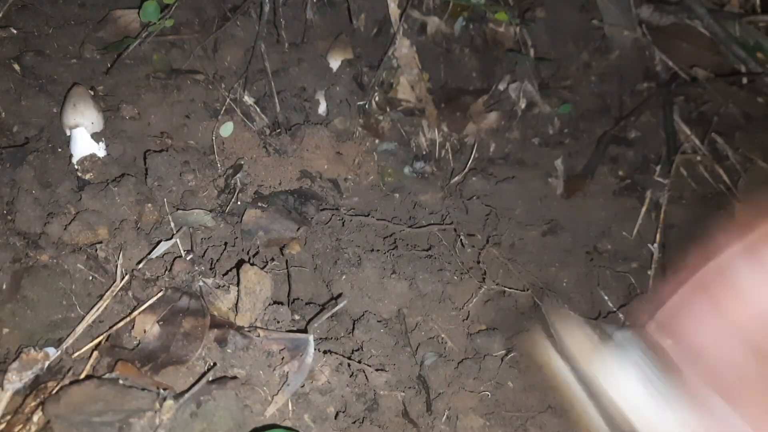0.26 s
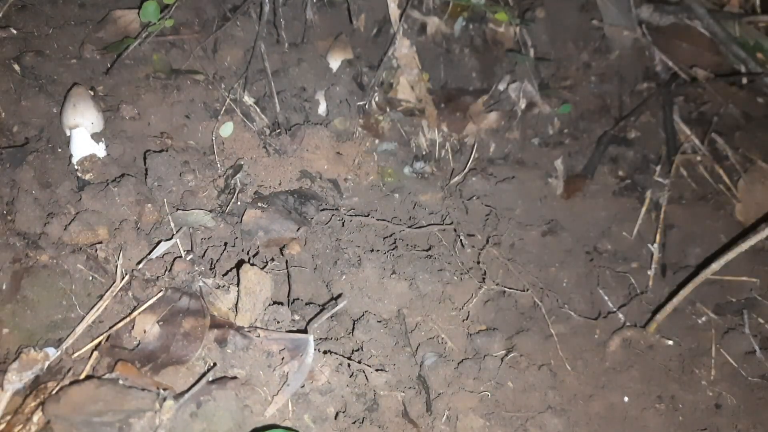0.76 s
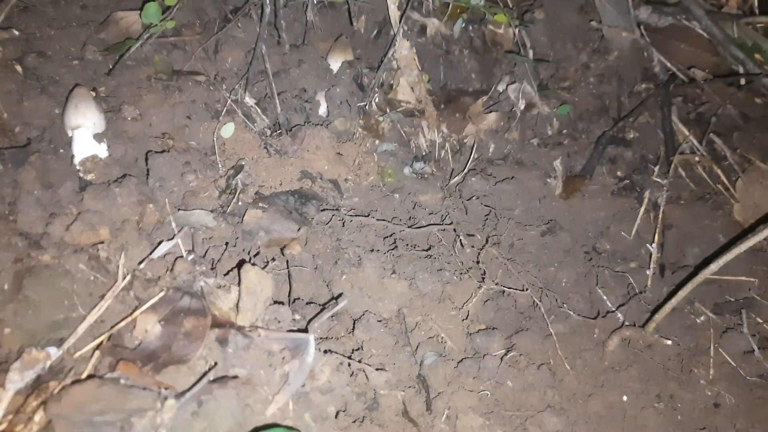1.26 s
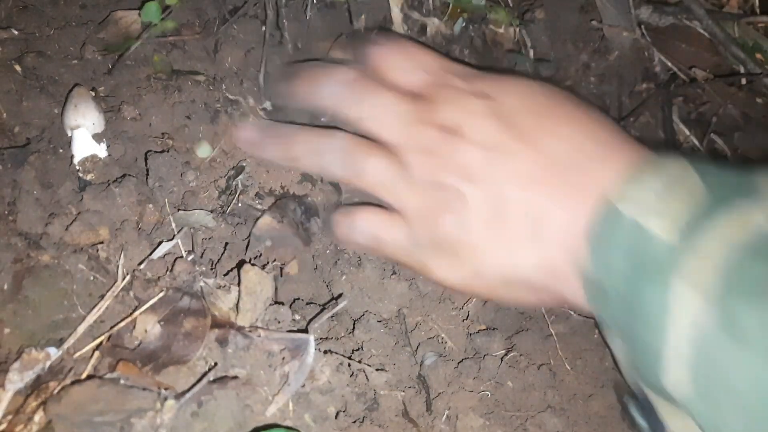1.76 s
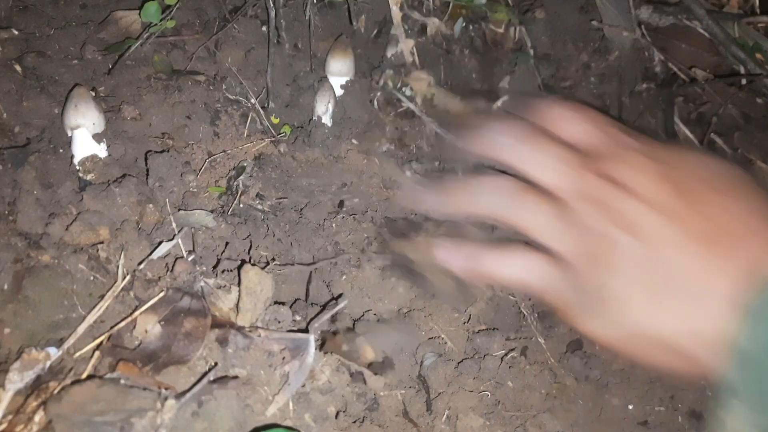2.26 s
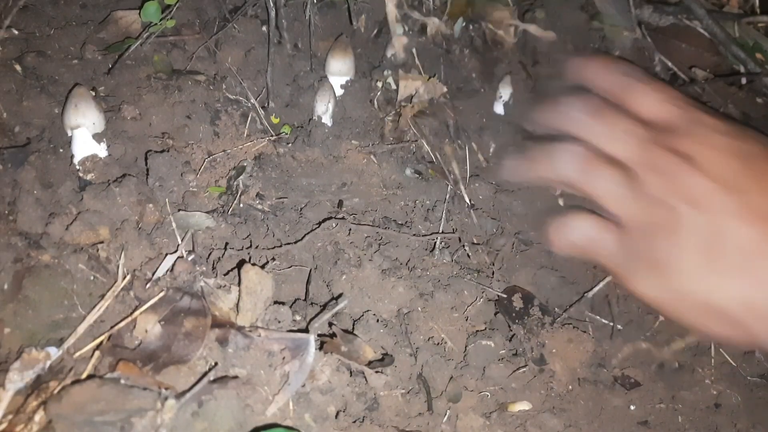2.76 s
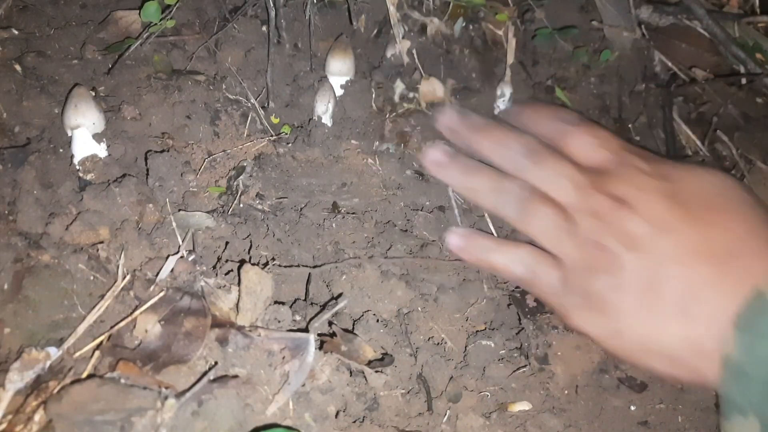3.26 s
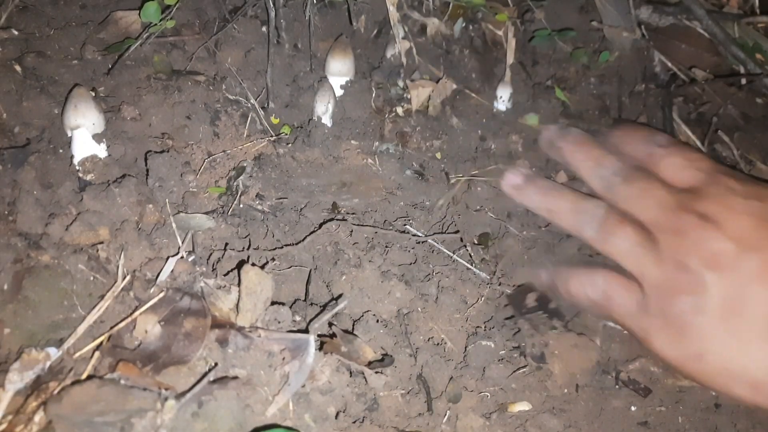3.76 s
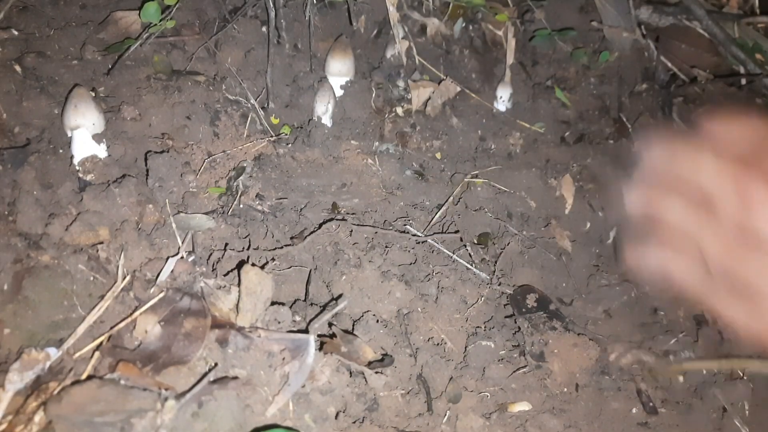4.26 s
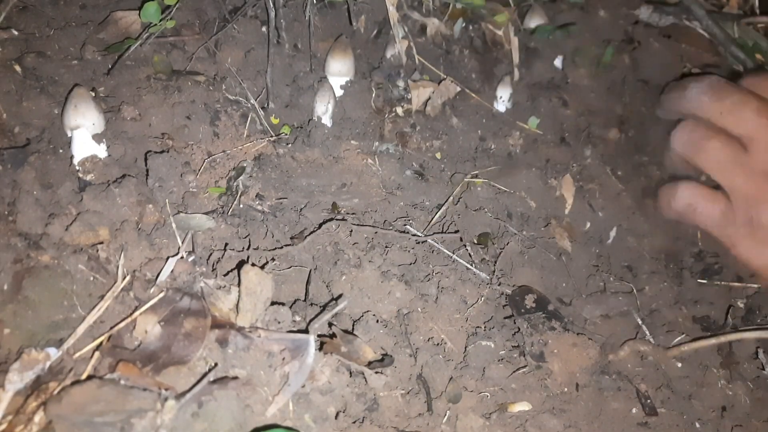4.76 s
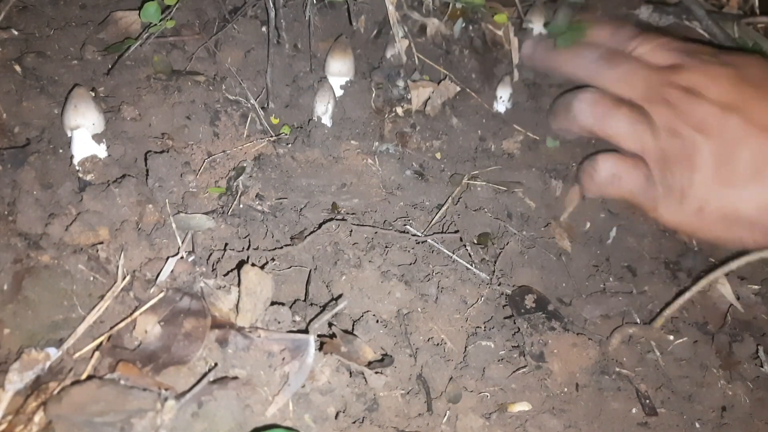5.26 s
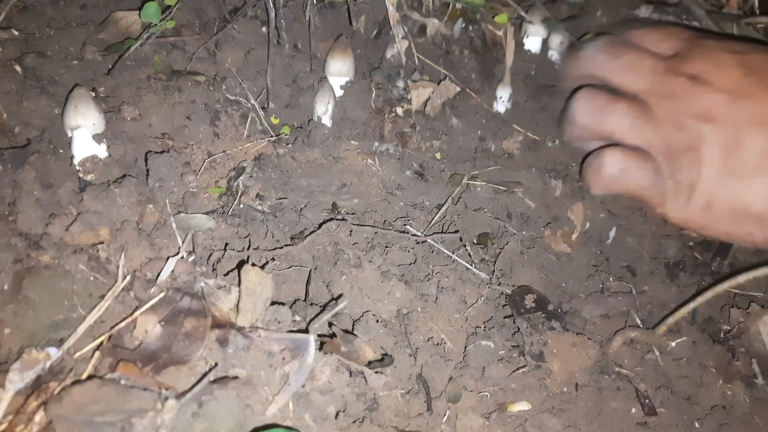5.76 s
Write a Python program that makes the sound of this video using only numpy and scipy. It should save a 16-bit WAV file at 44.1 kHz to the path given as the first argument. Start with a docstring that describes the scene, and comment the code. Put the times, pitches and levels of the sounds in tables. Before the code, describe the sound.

A hand works dry soil close to a stereo microphone, slightly to the right. A sleeve swishes softly, then fingers break the crust with short crunches and dull thumps, dragging through crumbs and snapping bits of twig and leaf. The passing arm briefly buffets the microphone. Two harder strikes come near the middle, and the digging carries on. Behind it is a still woodland night with a low rumble and very faint insects.

```python
"""Woodland floor on a still night, stereo microphone close to a hand working dry soil for mushrooms.
A sleeve swishes in; at 0.5 s the fingers strike the crust with a crunch and a dull thump, then drag
through crumbs and snap bits of twig and leaf. Near 1.5 s the arm sweeps by and buffets the right port.
The hardest blows fall at 2.6 and 3.5 s, and the digging goes on to the end at 6 s. Throughout, the
undergrowth gives a faint short echo, and insects chirr far off over a low rumble."""
import sys
import numpy as np
from scipy import signal
from scipy.fft import rfft, irfft, next_fast_len
from scipy.io import wavfile
from scipy.ndimage import uniform_filter1d

SR = 44100
rng = np.random.default_rng(int(sys.argv[2]) if len(sys.argv) > 2 else 0)


def master_out(mix):
    """Clip the mix to full scale and print it as 16-bit PCM to the path in sys.argv[1]."""
    frames = np.transpose(np.atleast_2d(mix))
    ceiling = np.clip(frames, -1, 1)
    pcm = np.round(ceiling * 32767).astype(np.int16)
    wavfile.write(sys.argv[1], SR, pcm)


N = 265923
HZ = abs(np.fft.fftfreq(4096, 1 / SR))  # frequency axis of the dB curves

# fingers touch the crust, it breaks, the earth knocks and rebounds: t/s, break level/dB, t60/s,
# tilt/(dB per octave), clod ring f/Hz, touch lead/s, touch level/dB,
# knock level/dB, knock f/Hz, knock swell/s, rebound level/dB, rebound f/Hz
BLOWS = [(0.5375, -20.5, 0.039, 2, 2080, .025, -28.5, -23, 191, 0.0028, -30.5, 107),
         (1.360, -16.8, 0.085, 2.5, 1620, 0.016, -24.5, -16.5, 134, 0.003, -29.5, 149),
         (1.384, -16.5, 0.026, 0, 2070, 0.01, -28.5, -27, 170, 0.0033, -26.5, 71.5),
         (2.5779, -11, 0.028, -1, 1940, 0.01, -27.5, -19.5, 181, 0.0051, -21.5, 86),
         (3.4621, -10, 0.013, 0.5, 1600, 0.0043, -37.5, -11.5, 220, 0.0011, -22, 83.6),
         (4.1912, -19, 0.062, .5, 2550, .0065, -26, -26.5, 180, 0.0044, -35.5, 89),
         (4.9581, -14, 0.06, -0.5, 1514, 0.013, -32.5, -20.5, 208, 0.0031, -25.5, 89.5),
         (5.7973, -19, 0.09, 0, 1400, 0.0082, -35.5, -28, 219, 0.0054, -38, 112)]
# how much the hand stirs the loose litter: t/s, relative level/dB
STIRRING = [(0, -56.5), (.14, -50.5), (.42, -53), (.6, -72), (.8, -50.5), (1.4, -51), (2.33, -56),
            (2.6, -64), (2.92, -42), (3.07, -59), (3.45, -63.5), (3.9, -55.5), (4.3, -59.5), (4.57, -49),
            (4.78, -80), (5.05, -61), (5.66, -63), (5.84, -51), (6.03, -65)]
# spectrum of crumbs and dry bits: f/Hz, level/dB
CRUMB_SPECTRUM = [(150, -6.5), (300, -2.5), (600, -5), (850, -6), (1200, -1), (1700, 3.5), (2300, -8),
                  (3000, -5), (4000, -5.5), (5500, -9), (8200, -2), (9300, -10), (12500, -8.5),
                  (15800, -12)]
# how alike sleeve and night air are at the two microphone ports: f/Hz, likeness
AIR_LIKENESS = [(60, 0.97), (250, 0.88), (600, 0.82), (2000, 0), (5000, 0)]


def soil():
    """Close up: a light touch, a dense crunch as the crust breaks, and grainier drags through crumbs."""
    # spectrum of the dry crust: f/Hz, level/dB
    crust = [(150, 4), (300, 4.5), (600, -7.5), (850, -7), (1200, -6.5), (1700, 6.5), (2300, -8),
             (3000, -7.5), (4000, -10), (5500, -12.5), (8200, -7.5), (9300, -16.5), (12500, -11),
             (15800, -15.5)]
    # finger drags: t/s, level/dB, rise/s, t60/s, tilt/(dB per octave), ring f/Hz
    scrapes = [(.52, -36.5, 0.022, 0.057, -1, 607), (0.766, -40, 0.014, 0.35, -1, 1950),
               (.83, -38, 0.041, 0.13, 2, 8200), (.95, -33, 0.02, 0.038, 4.5, 7040),
               (1.345, -29, 0.02, 0.086, -8, 590), (1.675, -45, 0.017, 0.23, 0.5, 1970),
               (1.909, -44.5, 0.032, 0.46, 2.5, 1750), (2.825, -42.5, .009, 0.19, 0.5, 2310),
               (2.912, -34, 0.04, 0.3, 3, 1650), (3.033, -34, 0.021, 0.038, 1.5, 2340),
               (3.74, -27, 0.035, 0.096, 1, 7300), (3.782, -23.5, 0.0081, 0.055, 1, 2470),
               (4.328, -29.5, 0.011, 0.053, 1, 2980), (4.48, -35, .021, 0.12, -1, 2580),
               (4.59, -29, 0.03, 0.13, 1, 2460), (4.623, -27, 0.0081, 0.092, 1.5, 1600),
               (4.68, -43.5, 0.0088, 0.23, 0.5, 710), (5.42, -45, 0.011, 0.25, -2, 1700),
               (5.659, -47.5, 0.021, 0.19, -1.5, 1860), (5.714, -38, 0.014, 0.11, 4, 2350),
               (5.799, -22, .009, 0.057, 7, 8300)]
    out, touch_rise_s = np.zeros((2, N)), 0.0022
    for s, db, t60, tilt_db, ring_hz, lead_s, touch_db, *_ in BLOWS:
        touch = burst(touch_db, touch_rise_s, t60=0.054, tilt_db=1.5, ring_hz=ring_hz, spectrum=crust,
                      ring_db=-6, per_s=16000, spread_db=5, ripple_db=4.5,
                      hold_s=max(lead_s - touch_rise_s, 0))  # lasts until the break
        crunch = burst(db, rise_s=0.0027, t60=t60, tilt_db=tilt_db, ring_hz=ring_hz, spectrum=crust,
                       ring_db=7.5, per_s=16000, spread_db=3, ripple_db=5.5)
        add(out, s - lead_s, touch)
        add(out, s, crunch)
    for s, *drag in scrapes:
        add(out, s, burst(*drag, CRUMB_SPECTRUM, ring_db=6.5, per_s=3600, spread_db=1,
                          ripple_db=5.5, clump_db=1.5))
    return out


def burst(db, rise_s, t60, tilt_db, ring_hz, spectrum, ring_db, per_s, spread_db, ripple_db,
          clump_db=0, hold_s=0):
    """A shower of grains that builds while the soil is loaded and dies as it settles."""
    # resonances of the microphone's housing and ports: f/Hz, width/Hz, level/dB
    housing = [(591, 175, 8), (774, 380, -3), (1530, 200, 4), (2335, 340, 8.5), (3160, 350, 0.5),
               (3640, 480, -5.5), (4470, 92, 5), (6270, 140, 4), (7540, 180, 0.5), (7750, 1200, -1.5),
               (10360, 1260, -2.5)]
    t = np.arange(SR // 3) / SR
    rise = np.minimum(t / max(rise_s, 1e-4), 1)
    decay = amp(-60 * np.maximum(t - rise_s - hold_s, 0) / max(t60, 1e-3))
    clumps = unit(amp(clump_db * wobble(len(t), per_s=275)))  # crumbs stick and give way together
    slope = tilt_db * np.log2(np.maximum(HZ, 400) / 3000)
    # each fragment has one main ring and many weaker ones of its own
    knots_hz = np.arange(0, SR / 2, 200)
    ripple = ripple_db * np.interp(HZ, knots_hz, rng.standard_normal(len(knots_hz)))
    ripple *= np.minimum(HZ / 4000, 1)
    ripple /= max(t60 / 0.087, 1)  # a long drag stirs many fragments, whose rings average out
    rings = peak(ring_hz, 280, ring_db) + ripple + sum(peak(*mode) for mode in housing)
    shower = grains(len(t), per_s, spread_db) * rise * decay * clumps
    return amp(db) * colour(shower, read(spectrum, HZ) + slope + rings)


def grains(count, per_s, spread_db):
    """Tiny fractures of uneven size, at the same instants for both ports."""
    size = amp(spread_db * np.minimum(rng.exponential(1, count), 4))
    breaks = rng.random(count) < per_s / SR
    return unit(size * breaks * rng.choice([-1, 1], (2, count)))


def earth(rebound_after_s=0.0199, rebound_swell_s=0.0072, clod_cycles=0.57):
    """Packed earth knocks and rebounds under each blow; dropped clods only tap it."""
    # small clods landing: t/s, level/dB, f/Hz
    clods = [(0.7645, -31.5, 312), (0.8256, -32, 300), (.858, -34, 335), (4.039, -36, 660)]
    pushes = [(s, db, hz, clod_cycles / hz) for s, db, hz in clods]
    for s, *_, knock_db, knock_hz, swell_s, rebound_db, rebound_hz in BLOWS:
        pushes.append((s, knock_db, knock_hz, swell_s))
        pushes.append((s + rebound_after_s, rebound_db, rebound_hz, rebound_swell_s))
    return swings(pushes, rough=0.043)


def swings(pushes, rough, sag_per_cycle=0.029):
    """Low, slightly ragged pushes that swell, then slow and settle within a few cycles."""
    out, t = np.zeros((2, N)), np.arange(SR // 6) / SR
    for s, db, hz, swell_s in pushes:
        swell = (t / swell_s * np.exp(1 - t / swell_s)) ** 0.81
        turns = np.cumsum(hz / (1 + sag_per_cycle * hz * t)) / SR
        motion = np.sin(2 * np.pi * turns) + rough * wobble(len(t), per_s=4.5 * hz)
        add(out, s, -amp(db) * swell * motion)
    return out


def twigs(ticks=24, low_hz=1570, high_hz=8300):
    """Twigs and leaves snap under the hand; stray ticks follow the strength of the stirring."""
    # the distinct snaps: t/s, relative level/dB, ring f/Hz
    snaps = [(0.763, -19.5, 8300), (0.783, -27, 1920), (.8034, -23.5, 2040), (.825, -21.5, 1970),
             (0.8562, -25, 1920), (0.8668, -27, 1950), (0.9711, -34, 7820), (1.2634, -28, 7800),
             (1.7391, -30, 8260), (2.174, -50, 5340), (2.2356, -39, 7700), (2.3103, -43, 7150),
             (2.41, -42, 7740), (2.4305, -44, 7900), (2.6632, -39.5, 8700), (2.7732, -32, 8900),
             (2.828, -25.5, 2320), (2.8726, -28, 7240), (2.9161, -23, 8750), (2.9353, -29, 8600),
             (2.9418, -22.5, 2750), (2.959, -37, 6500), (2.9745, -33, 6000), (2.9879, -26, 7340),
             (3.019, -29.5, 4500), (4.044, -37.5, 8030), (4.53, -24.5, 7560), (4.6016, -29, 2360),
             (5.31, -43.5, 1750), (5.4202, -37, 1700), (5.476, -37.5, 1740), (5.9915, -45.5, 5700)]
    out = np.zeros((2, N))
    for s, db, ring_hz in snaps:
        add(out, s, snap(db, ring_hz))
    for when, smallness, softness in rng.random((ticks, 3)):
        s = when * N / SR
        db = np.interp(s, *np.transpose(STIRRING)) + 12 - 1.5 * (2 * softness - 1)
        add(out, s, snap(db, low_hz * (high_hz / low_hz) ** smallness))
    return amp(-2.5) * out


def snap(db, ring_hz):
    """One dry piece breaking: the smaller it is, the higher and brighter."""
    return burst(db, rise_s=0.00004, t60=0.031, tilt_db=1.8 * np.log2(ring_hz / 4000), ring_hz=ring_hz,
                 spectrum=CRUMB_SPECTRUM, ring_db=12, per_s=14000, spread_db=-1.3, ripple_db=4.5)


def litter():
    """Fine crackle of leaves and dust that follows the stirring of the hand."""
    # spectrum of loose litter: f/Hz, level/dB
    spectrum = [(200, 13.5), (500, 6.5), (900, 2), (1300, -4), (2000, -1.5), (4000, -2.5), (6500, -2),
                (8200, 4), (9300, -9), (12500, -0.5), (15800, -3.5)]
    stirring = amp(np.interp(np.arange(N) / SR, *np.transpose(STIRRING)) - 2)
    return stirring * colour(grains(N, per_s=1800, spread_db=0.5), read(spectrum, HZ))


def sleeve(idle_db=-72.5):
    """Cloth, never quite still, slides with the arm: a soft swish, and a narrow sheen to the left."""
    # arm sweeps: fastest at t/s, length/s, swish level/dB, sheen level/dB
    sweeps = [(0.257, 0.57, -50.5, -80), (0.367, 0.44, -51.5, -48.5), (1.297, 0.5, -46.5, -72),
              (1.526, 0.44, -54, -52.5), (1.742, 0.55, -59, -49.5), (2.319, .15, -52, -62),
              (4.002, 0.25, -54.5, -59)]
    # spectra of the cloth's swish and the weave's sheen: f/Hz, level/dB
    cloth = [(60, -8.5), (300, 0), (800, -2), (1400, -5), (2500, -10.5), (5000, -14.5), (8200, -11.5),
             (16000, -57)]
    weave = [(60, -40), (7500, -33), (9200, -10), (10200, -9), (11100, -6), (11900, -8), (12700, -26),
             (16000, -13)]
    t, swish_power, sheen_power = np.arange(N) / SR, amp(idle_db) ** 2, 0
    for s, length_s, swish_db, sheen_db in sweeps:
        speed = np.cos(np.pi * np.clip((t - s) / length_s, -0.5, 0.5)) ** 2
        swish_power += (amp(swish_db) * speed) ** 2
        sheen_power += (amp(sheen_db) * speed ** 3.5) ** 2  # grows faster with speed than the swish
    swish = np.sqrt(swish_power) * colour(grains(N, per_s=9000, spread_db=1.5), read(cloth, HZ))
    sheen = np.sqrt(sheen_power) * noise(read(weave, HZ)) * amp([[2.5], [-2.5]])
    return ports(swish, AIR_LIKENESS, lag_s=0.00017) + sheen


def buffets(swell_s=0.0069):
    """Air pushed by the passing arm hits the microphone, mostly its right port."""
    # puffs of air: t/s, level/dB, f/Hz
    puffs = [(1.486, -18.5, 134.7), (1.563, -22.5, 97.6), (1.645, -30.5, 100.5), (1.669, -26, 91.5),
             (1.695, -28.5, 101)]
    return swings([(*puff, swell_s) for puff in puffs], rough=0.31) * amp([[-18], [0]])


def diffuse(x):
    """Fragments ring differently in each direction, so scatter keeps the loudness but loses the rings."""
    # spectrum coming back from all sides: f/Hz, level/dB
    spectrum = [(100, 1), (400, 2.5), (900, -5.5), (1600, 1.5), (2500, 2), (4000, -1.5), (6000, -4),
                (8200, -3.5), (9400, -8), (15800, -7.5)]
    power = abs(uniform_filter1d((x ** 2).mean(0), size=90))
    return np.sqrt(power) * noise(read(spectrum, HZ))


def undergrowth(x, t60, build_s):
    """Echoes from the stems and ground around the microphone, different at each port."""
    t = np.arange(SR // 2) / SR
    taps = grains(len(t), per_s=4200, spread_db=3) * amp(-60 * t / t60) * np.minimum(t / build_s, 1)
    return signal.oaconvolve(x, taps / np.linalg.norm(taps[0]), axes=1)[:, :N]


def insect(pitch_hz=6250):
    """One distant insect gives faint, slightly unsteady chirps."""
    # chirps: t/s, level/dB, length/s
    chirps = [(3.639, -61, 0.25), (5.198, -70, 0.18)]
    out = np.zeros((2, N))
    for s, db, length_s in chirps:
        count = int(length_s * SR)
        turns = np.cumsum(pitch_hz * (1 + 0.008 * wobble(count, per_s=265))) / SR
        add(out, s, amp(db) * signal.windows.hann(count) * np.sin(2 * np.pi * turns))
    return out


def chorus(centre_hz=8200, width_hz=400):
    """Farther off, small insects chirr in a narrow band that swells and fades unevenly."""
    band_db = -np.minimum(12 * ((HZ - centre_hz) / width_hz) ** 2, 60)
    pulsing = unit(amp(5 * wobble(N, per_s=10)))
    return amp(-73.5) * pulsing * noise(band_db)


def night():
    """The ambience of the place: a steady low rumble under a faint hiss that wavers."""
    # spectrum of the night air: f/Hz, level/dB
    spectrum = [(20, -36), (35, -12.5), (60, 4.5), (130, 0.5), (200, -3.5), (300, -10.5), (500, -24),
                (1000, -35.5), (2000, -30), (4000, -50), (6400, -32), (8100, -37), (9300, -40.5),
                (15800, -40)]
    air = noise(read(spectrum, HZ))
    rumble = signal.sosfiltfilt(signal.butter(2, 500, fs=SR, output="sos"), air)
    hiss = (air - rumble) * amp(0.48 * wobble(N, per_s=13))
    return amp(-50.5) * ports(rumble + hiss, AIR_LIKENESS)


def ports(x, likeness, lag_s=0, balance=None):
    """The microphone's two ports hear partly the same sound; the left gets it lag_s later."""
    size = next_fast_len(N + 512)
    hz = np.fft.rfftfreq(size, 1 / SR)
    other, right = rfft(x, size)
    same = np.clip(read(likeness, hz), 0, 1)
    left = (same * right + np.sqrt(1 - same ** 2) * other) * np.exp(-2j * np.pi * hz * lag_s)
    lean = amp(read(balance, hz) / 2) if balance else 1
    return irfft([left * lean, right / lean], size)[:, :N]


def amp(db):
    """Decibels to gain."""
    return 10 ** (np.asarray(db) / 20)


def unit(x):
    """Scales to rms 1."""
    return x / np.sqrt(np.mean(x ** 2) + 1e-20)


def read(points, hz):
    """Reads a spectrum table on a log-frequency axis."""
    f, value = np.transpose(points)
    return np.interp(np.log(hz + 1), np.log(f + 1), value)


def peak(hz, width_hz, db):
    """One resonance as a dB curve over HZ."""
    return db / (1 + ((HZ - hz) / (width_hz / 2)) ** 2)


def colour(x, db):
    """Minimum-phase filter of unit power with a dB curve over HZ."""
    log_gain = np.log(unit(amp(db)) + 1e-6)
    taps = np.fft.ifft(np.exp(np.conj(signal.hilbert(log_gain)))).real
    return signal.oaconvolve(x, taps[None], axes=1)[:, :x.shape[1]]


def noise(db):
    """Two unrelated channels of noise, shaped by a dB curve over HZ."""
    return colour(rng.standard_normal((2, N)), db)


def wobble(count, per_s):
    """Smooth random motion of rms near 1."""
    knots = rng.standard_normal(count // 20)
    return np.interp(np.arange(count) * per_s / SR, np.arange(len(knots)), knots)


def add(mix, s, sound):
    """Lays a sound into the mix at time s."""
    part = mix[:, max(round(s * SR), 0):][:, :sound.shape[-1]]
    part += sound[..., :part.shape[1]]


def scene():
    """The hand close on the right, the arm passing the microphone, undergrowth around, insects far off."""
    # how alike the hand's crackle is at the two ports: f/Hz, likeness (clipped to 0-1)
    likeness = [(60, 3), (300, 0.33), (700, -0.82), (1700, 1.84), (2800, 0.47), (4200, 0.5), (5200, -0.5),
                (8500, 0.38), (12000, 0), (16000, 0)]
    # its balance between them: f/Hz, left minus right level/dB
    balance = [(60, -5.5), (300, 4), (500, 1.5), (1000, -3), (1700, -5.5), (3000, -4), (4500, -8.5),
               (6500, -10), (8200, -9), (9500, 4), (13000, 1), (16000, -5)]
    crackle = ports(soil() + twigs() + litter(), likeness, lag_s=0.0003416, balance=balance)
    thumps = earth()
    scattered = diffuse(crackle) + amp(3) * thumps
    near_echo = amp(-12.5) * undergrowth(scattered, t60=0.088, build_s=0.007)
    far_echo = amp(-22.5) * undergrowth(scattered, t60=0.25, build_s=0.047)
    return crackle + thumps + near_echo + far_echo + buffets() + sleeve() + night() + insect() + chorus()


def record(dry, low_cut_hz=42, edge_hz=16000):
    """The recorder's bass roll-off and band limit."""
    dry = signal.sosfilt(signal.butter(2, low_cut_hz, "high", fs=SR, output="sos"), dry)
    band_limit = signal.firwin(401, edge_hz, window=("kaiser", 8), fs=SR)
    return signal.oaconvolve(dry, band_limit[None], "same")


dry = scene()
out = record(dry)
master_out(out)
```